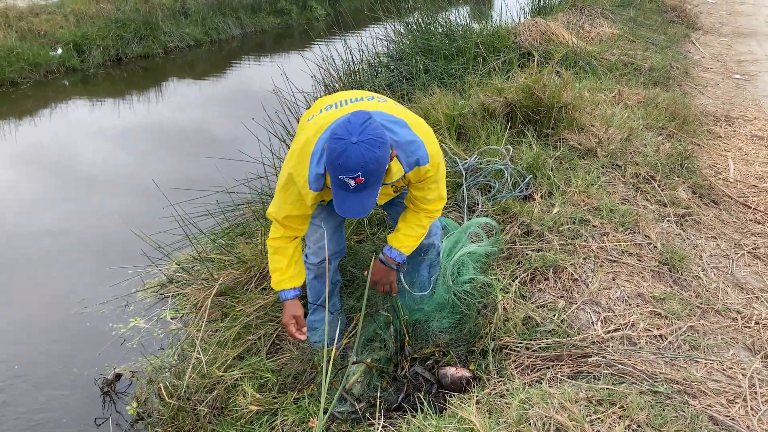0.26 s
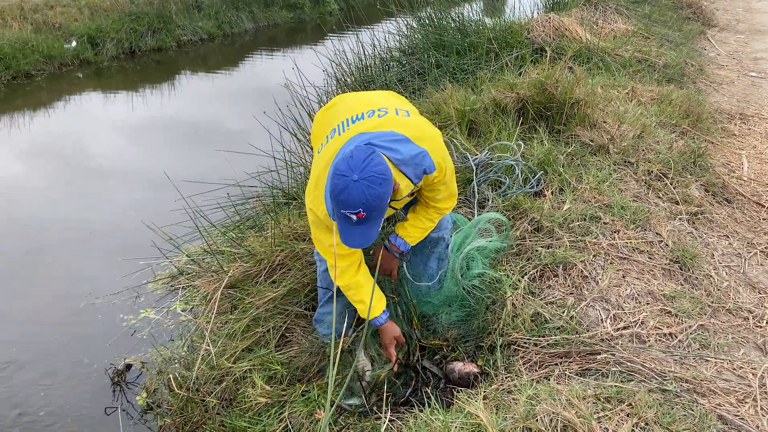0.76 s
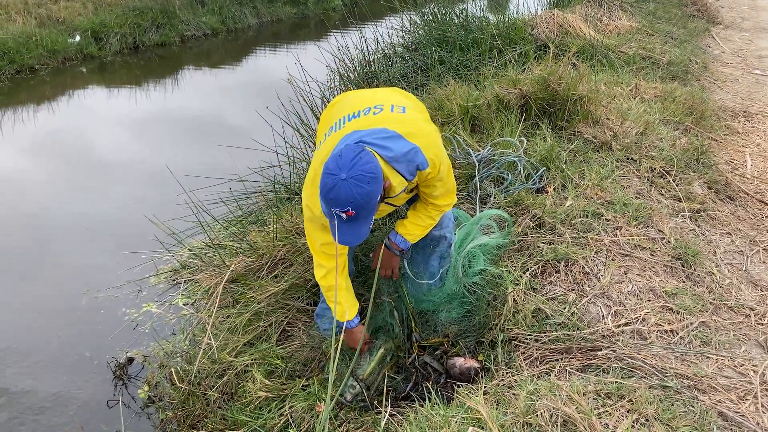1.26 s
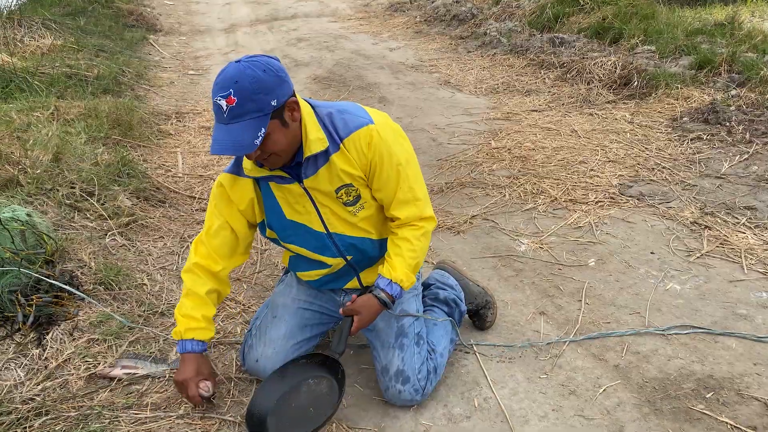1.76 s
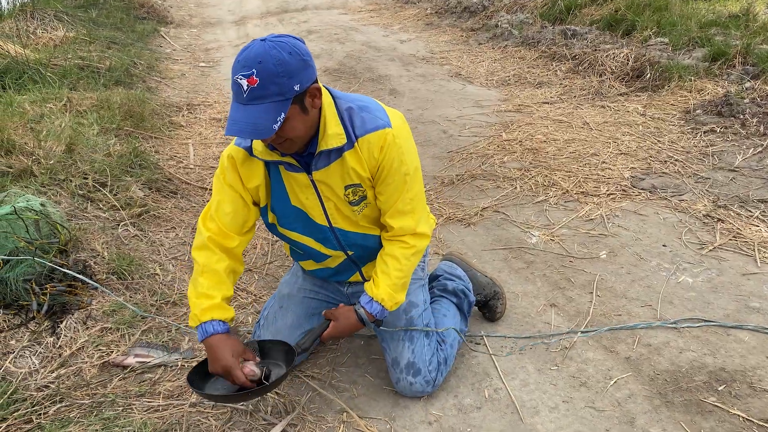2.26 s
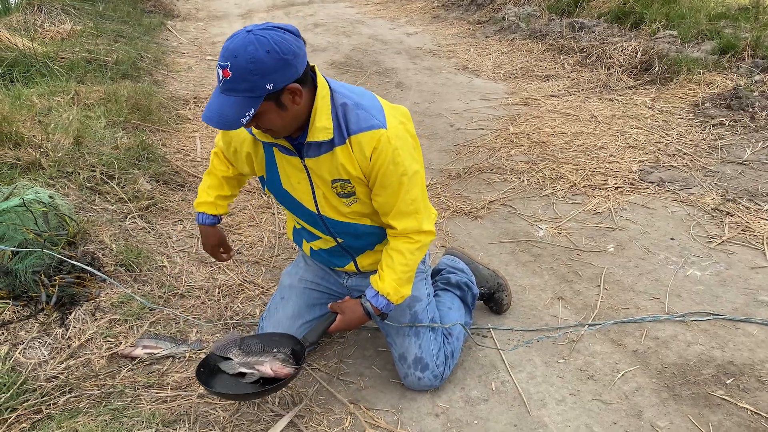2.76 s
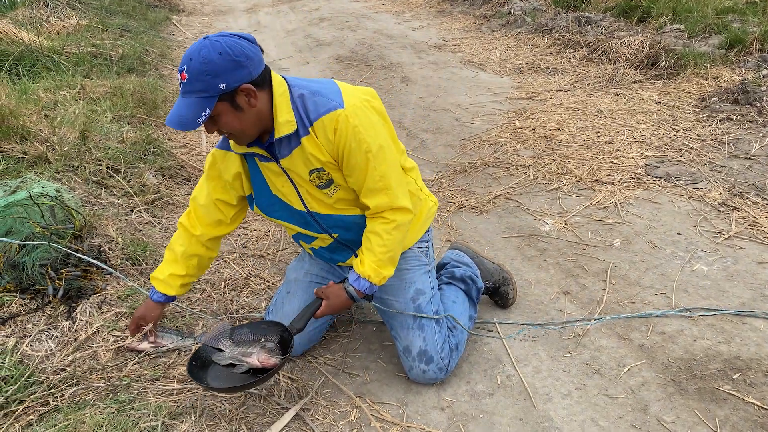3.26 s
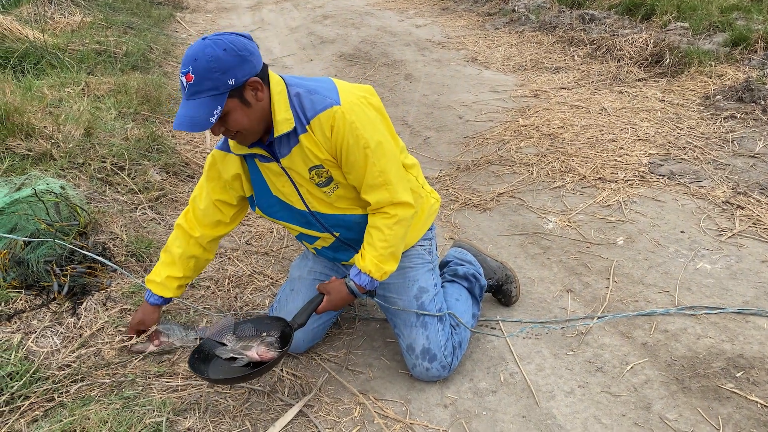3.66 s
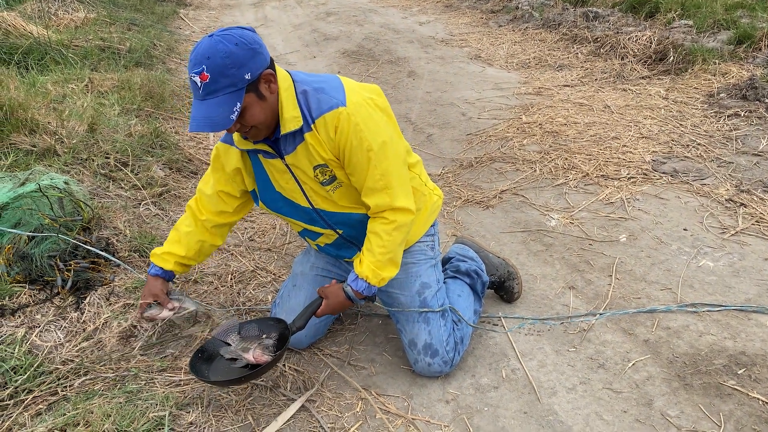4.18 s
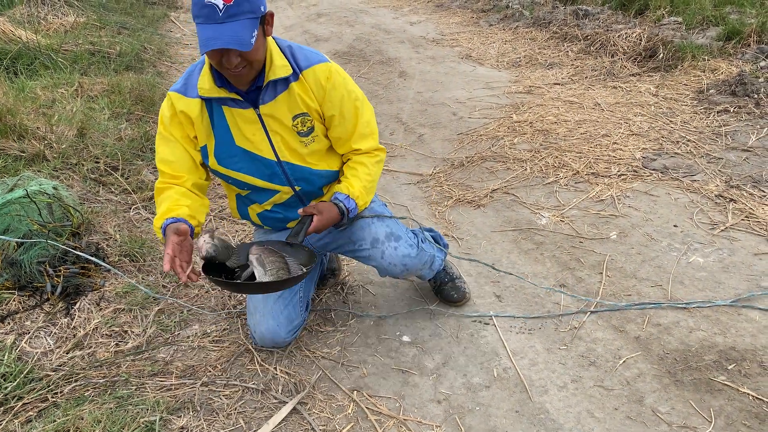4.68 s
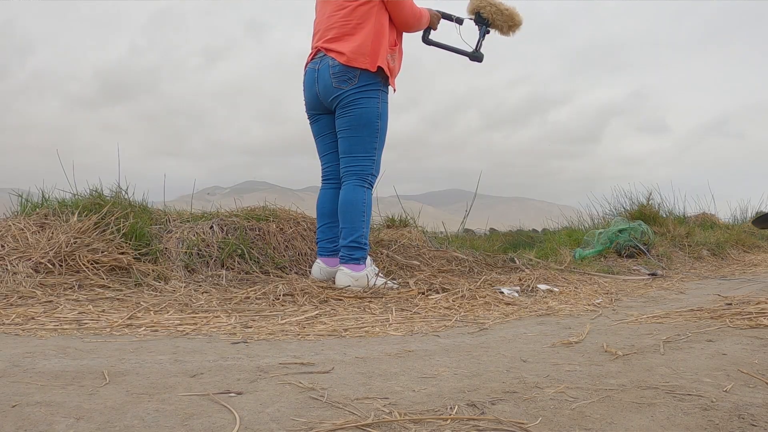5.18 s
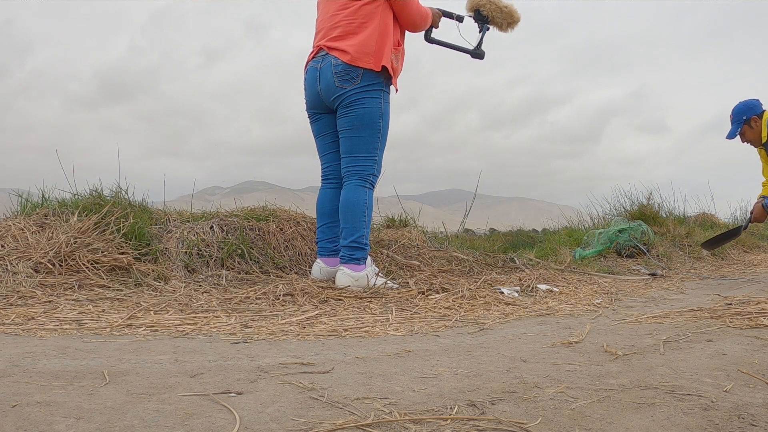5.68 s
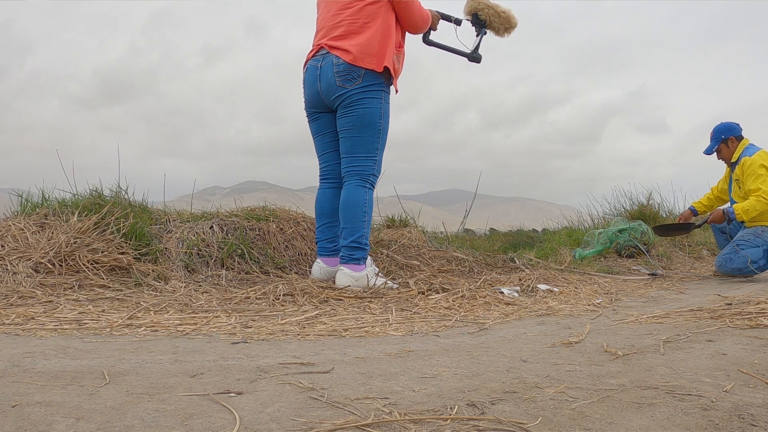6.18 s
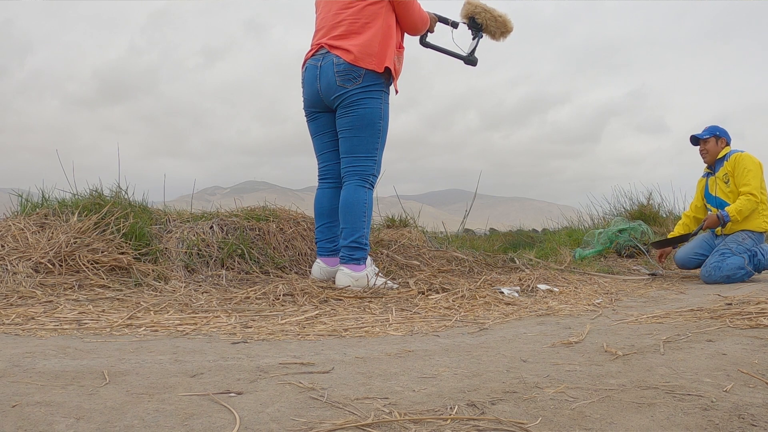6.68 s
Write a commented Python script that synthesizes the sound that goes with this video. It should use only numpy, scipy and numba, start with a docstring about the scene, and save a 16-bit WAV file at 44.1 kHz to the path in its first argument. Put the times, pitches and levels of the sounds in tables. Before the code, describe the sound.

Outdoors in rumbling wind, a plop and watery stirring give way to slapping fish on a dull-ringing frying pan, then boots and knees crackling straw.

```python
"""Fish in the canal and in the pan

At a canal, a small thrown fish slaps, bubbles and sprays, built from noise bursts and ringing air pockets;
a hand stirs the shallows. The fish then flaps in a steel pan: damped modes ring until the wet body mutes them.
Boots and knees crush dry straw, made of clicks and cracks; filtered noise makes the wind rumble on the
shielded microphone over its bright hiss."""
import sys
import numpy as np
from scipy import signal
from scipy.fft import rfft, irfft, next_fast_len
from scipy.io import wavfile
from scipy.ndimage import uniform_filter1d
from numba import njit

SR = 44100
rng = np.random.default_rng(int(sys.argv[2]) if len(sys.argv) > 2 else 0)


def log_audio(samples):
    """Write samples as a 16-bit WAV file to the path given in sys.argv[1]."""
    # one column per channel
    frames = np.atleast_2d(samples).T
    # limit to full scale, then quantise
    limited = np.clip(frames, -1, 1)
    pcm = np.round(limited * 32767).astype(np.int16)
    wavfile.write(sys.argv[1], SR, pcm)


N = 305701  # samples in the scene


def undb(db):
    """Decibels to gain."""
    return 10 ** (np.asarray(db) / 20)


def level(x, db):
    """Scale to an rms level."""
    return x * undb(db) / np.sqrt(np.mean(x ** 2))


def curve(table):
    """Points joined by straight lines in time."""
    return np.interp(np.arange(N) / SR, *np.transpose(table))


def band(x, lo_hz, hi_hz):
    """Gentle band-pass."""
    return signal.sosfilt(signal.butter(2, [lo_hz, hi_hz], "band", fs=SR, output="sos"), x)


def coloured(spectrum):
    """Noise with a spectrum of (Hz, dB) points."""
    size = next_fast_len(N)
    hz, db = np.transpose(spectrum)
    bin_hz = np.arange(size // 2 + 1) * SR / size
    gain = undb(np.interp(np.log(bin_hz + 1), np.log(hz), db, -120, -120))
    return irfft(rfft(rng.standard_normal(size)) * gain, size)[:N]


def walk(rate):
    """Random levels held 1 / rate s and slewed; spread near 1."""
    k = int(SR / rate)
    steps = np.repeat(rng.standard_normal(N // k + 1), k)
    return 1.3 * uniform_filter1d(uniform_filter1d(steps, k), k)[:N]


def clicks(rate, spread_db):
    """Random clicks, most small and a few large; rms 1."""
    hit = rng.random(N) < rate / SR
    size = np.minimum(rng.exponential(size=N), 3)
    return level(hit * rng.standard_normal(N) * undb(spread_db * size), 0)


def add(out, s, x):
    """Mix a short sound in at a time."""
    i = int(s * SR)
    out[i:i + len(x)] += x[:max(len(out) - i, 0)]


def swells(table, rise, fall, column=2):
    """Gain of movements that rise, hold and die away, with slopes in dB per s; powers add."""
    t, power = np.arange(N) / SR, 0
    for row in table:
        start, held = row[:2]
        before = np.maximum(start - t, 0)
        after = np.maximum(t - start - held, 0)
        db = row[column] - rise * before - fall * after
        power = power + undb(2 * np.maximum(db, -150))
    return np.sqrt(power)


def bursts(table, t60_s, wide_db, tock_db):
    """Each row a crack of noise around its centre, a short tock at the centre and a broad tick at the front."""
    out = np.zeros(N)
    t = np.arange(int(.15 * SR)) / SR
    onset = np.sin(np.minimum(t / 0.0033, 1) * np.pi / 2) ** 2
    fade = np.exp(-np.log(1000) * t / t60_s) * onset
    for s, db, hz, octaves in table:
        noise = rng.standard_normal((2, len(t)))
        half = 2 ** (octaves / 2)
        body = level(band(noise[0], hz / half, hz * half), 0) * fade
        # narrow cracks are more pitched
        tock = undb(tock_db) / half ** 3 * np.sin(2 * np.pi * hz * t) * fade ** 0.77
        tick = undb(wide_db) * noise[1] * fade ** 2.2
        add(out, s, undb(db) * (body + tock + tick))
    return out


# Bright hiss of the microphone. Each row: frequency in Hz, relative density in dB per Hz.
HISS_SPECTRUM = [(590, 0.5), (1000, 3), (1680, -3), (2070, -3.5), (2320, -5.5), (2580, -5.5), (3210, -3),
                 (4000, -5.5), (15800, 3.5)]


def hiss():
    """Steady coloured noise of the microphone, its level wavering slightly."""
    return level(coloured(HISS_SPECTRUM), -51.5) * undb(.5 * walk(3.6))


# Gusts at the microphone. Each row: time in seconds, level in dB.
GUST_LEVELS = [(0.0, -41), (0.04, -49), (0.21, -40.5), (0.25, -47), (0.62, -37), (0.63, -41), (0.81, -35.5),
               (0.85, -45), (0.96, -37.5), (1.12, -48), (2.31, -46.5), (2.43, -43), (2.47, -46.5),
               (3.67, -48.5), (3.74, -44), (3.78, -47.5), (4.44, -44), (4.5, -48), (4.77, -40), (4.84, -48),
               (5.42, -40.5), (6.72, -46), (6.85, -38.5), (6.93, -48)]
# Colour of the wind on the shield. Each row: frequency in Hz, relative density in dB per Hz.
WIND_SPECTRUM = [(15, -57), (25, -41), (54, -15), (96, -1.5), (175, -8.5), (204, -13), (238, -17),
                 (364, -25), (409, -24), (459, -26.5), (535, -25.5), (674, -29.5), (954, -36.5),
                 (2500, -38.5), (3250, -82), (5500, -120)]


def wind():
    """Turbulence on the windshield: the rumble follows the gusts, its upper part less and with its own flicker."""
    gust_db = curve(GUST_LEVELS)
    air = level(coloured(WIND_SPECTRUM), 0)
    rumble = signal.sosfilt(signal.butter(4, 230, fs=SR, output="sos"), air)
    upper = air - rumble
    upper_db = -45.5 + 0.61 * (gust_db + 45.5) + 1.3 * walk(6.31)
    return rumble * undb(gust_db + 1.6 * walk(12.0)) + upper * undb(upper_db)


# Boots, knees and clothes moving in the straw.
# Each row: start in seconds, held time in seconds, level in dB, treble level in dB.
STRAW_MOVES = [(4.4, 0.13, -53.5, -58), (4.565, 0.11, -42, -54), (4.75, 0.016, -44, -53),
               (4.82, 0.09, -47.5, -49.5), (4.95, .9, -55, -67), (5.08, 0.019, -38.5, -45),
               (5.1, .05, -45, -49.5), (5.15, 0.02, -37.5, -48), (5.25, 0.03, -36, -53),
               (5.335, 0.0083, -50, -43.5), (5.49, 0.0066, -39.5, -37.5), (5.51, 0.019, -45, -46),
               (5.725, 0.011, -45, -41), (5.875, .03, -44, -45), (5.92, .22, -50, -62),
               (6.19, 0.11, -43, -49), (6.29, 0.017, -42, -41), (6.33, .22, -58.5, -55),
               (6.84, 0.07, -48.5, -57)]


def straw():
    """Dense small cracks of dry stalks, each smeared by a short ring, in a low and a high band."""
    low = band(clicks(4000, 1.6), 400, 3280) + 1.56 * band(clicks(600, 2.7), 330, 1290)
    high = band(clicks(4000, 4.9), 2700, 19845)
    low_gain = swells(STRAW_MOVES, rise=960, fall=520) * undb(2.8 * walk(60))
    high_gain = swells(STRAW_MOVES, rise=960, fall=520, column=3) * undb(2.2 * walk(36))
    return level(low, -2.36) * low_gain + level(high, -1.6) * high_gain


# Straw snapping under boots and knees.
# Each row: start in seconds, level in dB, centre in Hz, width in octaves.
STRAW_SNAPS = [(4.493, -37, 1190, 2.9), (4.602, -28.5, 560, 4.6), (4.659, -31, 1090, 1.1),
               (4.701, -38, 1530, 1.1), (4.746, -33.5, 1180, 1.1), (4.793, -26, 987, 0.75),
               (5.081, -28.5, 3910, 0.58), (5.082, -27, 1690, 2.6), (5.095, -33, 1260, 2.0),
               (5.162, -25, 910, 1.1), (5.247, -17, 612, 2.7), (5.269, -20.5, 1720, 1.4),
               (5.28, -29, 1376, 1), (5.353, -33.5, 1820, 1.5), (5.491, -12, 1620, 1.3),
               (5.677, -34.5, 1050, 1.4), (5.725, -18, 2830, 3.4), (5.87, -28, 4070, 1.55),
               (5.879, -27, 940, 2.7), (5.953, -31.5, 420, 1.46), (6.029, -38.5, 797, 1.7),
               (6.05, -37, 467, 1), (6.199, -32.5, 665, 2.6), (6.234, -26, 1600, 1.8),
               (6.269, -33, 1400, 0.98), (6.296, -25, 3820, 1.33), (6.301, -27.5, 1710, 1.1),
               (6.39, -32.5, 576, 1.8), (6.523, -30, 1070, 1.74), (6.857, -33.5, 2050, 1.8)]


def snaps():
    """Breaking stalks crack as short noise with a strong pitched tock."""
    return bursts(STRAW_SNAPS, t60_s=0.025, wide_db=0.5, tock_db=10.5)


# Dull thumps of the fish's body and of knees.
# Each row: start in seconds, level in dB, centre in Hz, width in octaves.
BODY_THUMPS = [(.519, -22, 250, 0.26), (.526, -14.5, 692, 1.2), (.597, -33, 198, 0.79),
               (2.419, -24.5, 643, 1.0), (2.421, -29, 220, 1.5), (2.427, -23.5, 805, 0.58),
               (2.578, -28, 370, 1.6), (4.745, -34.5, 231, 0.83), (5.162, -30.5, 324, 0.75),
               (5.269, -31, 390, 2.2), (6.389, -39.5, 250, 1)]


def thumps():
    """Soft bodies thump as longer noise with hardly any tick."""
    return bursts(BODY_THUMPS, t60_s=0.059, wide_db=-29, tock_db=4.5)


def bubble(hz, cycles, rise):
    """A pocket of air rings, bends in pitch (up near the surface, down in collapse) and shakes in churning water."""
    u = np.arange(int(2.2 * cycles / hz * SR)) * hz / (cycles * SR)  # time in ring lengths
    shake = np.repeat(rng.standard_normal(len(u)), max(int(1.5 * SR / hz), 1))[:len(u)]
    pitch_hz = hz * 2 ** (rise * np.minimum(u, 1.2) + 0.13 * shake)
    phase = 2 * np.pi * np.cumsum(pitch_hz) / SR
    return np.sin(phase) * np.exp(-u - 1.2 * u ** 2) * (1 - np.exp(-u / .08))


# Bubbles in the canal; a rising pocket climbs in pitch, a collapsing one falls.
# Each row: start in seconds, level in dB, starting pitch in Hz, ring length in cycles,
# rise in octaves per ring length.
WATER_BUBBLES = [(.378, -27, 1280, 16, -.14), (.38, -32, 2660, 15, -0.22), (.399, -18.5, 1210, 9.2, .1),
                 (.425, -26, 633, 12, -0.57), (.427, -28, 1520, 20, 0.14), (.454, -14, 490, 4.7, -0.19),
                 (.457, -29, 4450, 67, 0), (.473, -25, 1795, 30, .05), (.48, -24, 1002, 9.5, -.24),
                 (.489, -22, 1124, 16, .03), (.518, -19, 3790, 54, 0.17), (.519, -15.5, 4790, 18, -.09),
                 (.519, -11, 420, 3.1, 0.47), (.521, -20.5, 1770, 11, .08), (.527, -18, 632, 15, .23),
                 (.534, -20, 728, 12.6, .6), (.544, -20, 1200, 25, .41), (0.575, -33, 2117, 29, .37),
                 (.607, -29, 4700, 20, 0.00037), (.609, -26.5, 1480, 6.1, 0.41),
                 (.651, -34.5, 587, 16, 0.64), (.726, -32, 3440, 22, .37), (0.736, -30, 3770, 18, 0.54),
                 (.773, -35, 5000, 15, 1.1), (.809, -37.5, 1580, 16, 0.024), (.828, -42, 817, 38, 0.18),
                 (.867, -36.5, 940, 19, 0.2), (.869, -36.5, 2126, 18, 0.25), (.936, -26, 1670, 15, 0.061),
                 (.977, -31, 2450, 16, 1.25), (.985, -30, 1710, 13, 0.56), (1.024, -26.5, 4130, 16.4, 0.81),
                 (1.087, -39, 2514, 22, 0.034), (1.203, -44.5, 2270, 24, -.06),
                 (1.22, -48, 1110, 62, -0.23), (1.377, -41, 856, 6, .18), (1.423, -22, 958, 14, 0.37),
                 (1.425, -25, 966, 17.6, -.15), (1.46, -31.5, 224, 9, 0.02), (1.502, -33.5, 237, 7.3, 0.39),
                 (1.503, -30, 950, 13, 1.2), (1.556, -29.5, 925, 8, 0.11), (1.567, -30.5, 693, 7.8, 0.29),
                 (1.588, -33.5, 1160, 12, .16), (1.686, -43, 870, 19, 0.38), (1.742, -41.5, 399, 9.5, 1.6),
                 (1.755, -36, 1090, 23, 0.072)]
# Surges of spray and droplets falling back. Each row: start in seconds, held time in seconds, level in dB.
SPRAY_SURGES = [(.38, .07, -39), (.46, 0.051, -39.5), (.505, 0.028, -32.5), (.607, 0.005, -41.5),
                (.64, .28, -51), (.93, 0.022, -42.5), (1.024, .005, -48.5), (1.204, .15, -59),
                (1.426, 0.0039, -50), (1.45, 0.11, -53), (1.562, 0.011, -50.5), (1.62, .14, -58.5)]


def water():
    """Large bubbles, and a dense shower of small ones whose loudness follows the spray."""
    out, shower = np.zeros(N), np.zeros(N)
    for s, db, hz, cycles, rise in WATER_BUBBLES:
        add(out, s, undb(db) * bubble(hz, cycles, rise))
    start, end = SPRAY_SURGES[0][0], sum(SPRAY_SURGES[-1][:2])
    for when, pitch, life, size in rng.random((2200, 4)):
        droplet = bubble(520 * 2 ** (3.7 * pitch), 2.5 + 12 * life, 0.3 * life)
        gain = (1.02 - size) ** -.4 * 2 ** (.25 * pitch)
        add(shower, start + when * (end - start), gain * droplet)
    shower = shower / np.sqrt(np.mean(shower[shower != 0] ** 2))
    # thin sheets of water tear with a fizz
    fizz = level(band(rng.standard_normal(N), 900, 8000), -6) * undb(1.5 * walk(120))
    return out + swells(SPRAY_SURGES, rise=1100, fall=280) * (shower + fizz)


# Wet slaps on water and pan. Each row: start in seconds, level in dB, centre in Hz, width in octaves.
WET_SLAPS = [(.3789, -16.5, 1400, 3.2), (.3988, -21, 1210, 4.6), (.4263, -24.5, 1620, 3.2),
             (.4541, -23.5, 1180, 4.7), (.5195, -22, 4530, 0.58), (.5288, -18, 1020, 3),
             (.616, -33, 1010, 3.7), (.829, -31.5, 1710, 2.7), (.8485, -34.5, 1080, 4.5),
             (.9216, -28.5, 1610, 3.9), (.9491, -27.5, 1110, 3.9), (1.4614, -36, 1140, 3.8),
             (1.496, -33, 1000, 1.8), (2.2097, -27, 1300, 3.3), (2.3624, -19, 1220, 2.0),
             (2.3699, -17, 1220, 4), (2.405, -26.5, 2780, 0.97), (2.4194, -18.5, 1000, 4.4),
             (2.422, -20, 4000, 2.7), (2.4269, -21, 2350, 1.3), (2.5257, -28, 1200, 2),
             (2.5653, -22.5, 3100, 2.0), (2.5755, -11, 1790, 1.3), (2.6087, -28, 1600, 1.7),
             (2.6254, -23.5, 1620, 2.3), (2.7664, -29.5, 1190, 4.3), (3.339, -37, 2140, 1.6)]


def slaps():
    """Wet flesh slaps as a short crack of noise with a tock and a tick."""
    return bursts(WET_SLAPS, t60_s=0.028, wide_db=-4.5, tock_db=6)


@njit
def ring(x, pole, damp):
    """One mode whose loss may change every sample."""
    y, z = np.empty(len(x)), 0j
    for i in range(len(x)):
        z = z * pole * damp[i] + x[i] + 1e-18
        y[i] = z.imag
    return y


# The fish's body falls flat on the steel and muffles it.
# Each row: start in seconds, length in seconds, damping at 2500 Hz in dB per s.
BODY_PRESSES = [(2.304, .025, 350), (2.371, 0.058, 800), (2.536, .025, 800), (2.583, 0.022, 1100),
                (2.596, 0.18, 450), (3.0, 1.9, 700)]


def muffling():
    """Damping of the pan at 2500 Hz in dB per s: the resting fish, or its body pressed flat."""
    t = np.arange(N) / SR
    landing, settled = PAN_BLOWS[0][0], BODY_PRESSES[-1][0]
    # 100 dB per s as the fish lands, growing by 450 each second while it settles
    load = 100 + 450 * np.clip(t - landing, 0, settled - landing)
    for start, length, db_per_s in BODY_PRESSES:
        load[int(start * SR):int((start + length) * SR)] = db_per_s
    return np.maximum(uniform_filter1d(load, size=400), 0)


# Blows on the pan. Each row: start in seconds, level at 2000 Hz in dB, hardness in dB per octave,
# place round the rim from 0 to 1.
PAN_BLOWS = [(2.209, -27.5, -3, 0.32), (2.224, -34, 7.5, 0.66), (2.242, -32, 3.5, 0.05),
             (2.261, -33, 2.5, 0.56), (2.322, -23.5, 1.0, .73), (2.342, -28, -12.5, 0.4),
             (2.406, -38, -1, .54), (2.42, -25, 2.5, 0.37), (2.444, -27.5, 1, 0.95), (2.454, -25, 0, 0.75),
             (2.525, -30, -10.5, .11), (2.567, -17.5, 1.5, 0), (2.576, -38.5, 12, .5),
             (2.611, -39.5, 9.5, 0.4), (3.338, -39.5, 0, 0.6), (4.561, -44, -5, .55),
             (4.629, -42.5, 7.5, .78), (4.66, -36, -3, 0.1), (4.744, -37.5, -5, 0.44)]
# Pan modes, in pairs with crossed nodal lines.
# Each row: level in dB, unmuffled 60 dB decay time in seconds, family 0 or 1.
PAN_MODES = [(-5.5, 0.13, 0), (-1.5, 0.049, 0), (-9.5, 0.55, 0), (-5, 0.13, 1), (-14, 0.05, 0),
             (-6.5, 0.55, 0), (-9, 0.19, 1), (-9, 0.1, 1), (-4, 0.2, 0), (-10, 0.083, 1), (-9, 0.073, 0),
             (-10, 0.2, 0), (-20, 0.26, 0), (-17, 0.34, 1), (-23, 0.44, 0), (-21, 0.17, 1), (-19.5, .15, 0),
             (-23, 0.13, 1), (-28, .15, 0), (-32, 0.138, 0), (-18, 0.14, 1)]
# Frequencies of those modes in the same order, in Hz.
PAN_MODE_HZ = [947, 1236, 1346, 1650, 1925, 2346, 2457, 3094, 3252, 3817, 3940, 4262, 4440, 5184, 5389,
               6605, 7897, 8685, 10160, 10470, 11420]
# Scales sliding over the steel. Each row: start in seconds, held time in seconds, level in dB.
SCALE_SLIDES = [(2.208, 0.12, -47.5), (2.33, 0.089, -40), (2.42, 0.14, -41), (2.58, 0.008, -33),
                (2.62, .04, -57), (4.56, 0.073, -44), (4.76, .16, -55)]


def pan():
    """Blows and sliding scales drive the modes; the place of contact chooses between the two families."""
    out = np.zeros(N)
    damp = undb(-muffling() / SR)
    slide = clicks(3000, 6.5) * swells(SCALE_SLIDES, rise=1500, fall=136)
    # rim and handle add a crowd of weak, short high modes
    crowd = [(4700 * 2 ** (1.6 * pitch), -24, .07, family) for pitch, family in rng.random((34, 2))]
    modes = [(hz, *row) for hz, row in zip(PAN_MODE_HZ, PAN_MODES)] + crowd
    s, blow_db, hardness_db, place = np.transpose(PAN_BLOWS)
    scatter_db = 2.8 * rng.standard_normal((len(s), len(modes)))
    angle = place * np.pi / 2
    # flesh lands softly: each blow is a rough push of a few milliseconds
    u = np.arange(int(0.0072 * SR)) / (0.00085 * SR)
    soft = 2 / np.sum(u * np.exp(-u)) * u * np.exp(-u)
    for k, (hz, db, t60, family) in enumerate(modes):
        turn = 2 * np.pi * hz / SR  # radians per sample
        share = np.sin(angle) if family > .5 else np.cos(angle)
        octaves = np.log2(min(hz, 7000) / 2000)
        force = share * undb(blow_db + hardness_db * octaves + scatter_db[:, k])
        roughness = 1 + .5 * rng.standard_normal(len(u))
        contact = soft * np.sin(turn * np.arange(len(u))) * roughness
        push = slide * undb(-29 + 5.6 * walk(40.03))
        for when, size in zip(s, force):
            add(push, when, size * contact)
        # the wet load dulls high modes first and pulls each mode a little off its pitch as it shifts
        detune = np.exp(1j * turn * 0.0036 * walk(25.04))
        loss = damp ** ((hz / 2500) ** 0.52) * detune
        pole = np.exp(1j * turn - np.log(1000) / (t60 * SR))
        out += undb(db) * ring(push, pole, loss)
    scrape = undb(-9.5) * band(slide, 600, 19845)
    return band(out, 510, 19845) + scrape


def scene():
    """Everything reaches one microphone, heard alike on both channels."""
    background = hiss() + wind()
    ground = straw() + snaps() + thumps()
    fish = water() + slaps() + pan()
    mono = background + ground + fish
    return np.array([mono, mono])


def record(dry):
    """The microphone drops the deepest bass; the top is cut steeply at 15830 Hz."""
    thin = signal.sosfilt(signal.butter(2, 45, "high", fs=SR, output="sos"), dry)
    return signal.sosfilt(signal.ellip(10, .2, 70, 15830, fs=SR, output="sos"), thin)


dry = scene()
out = record(dry)
log_audio(out)
```